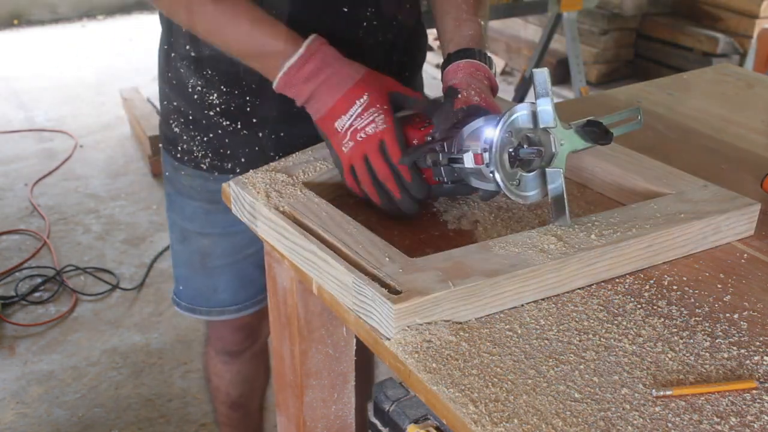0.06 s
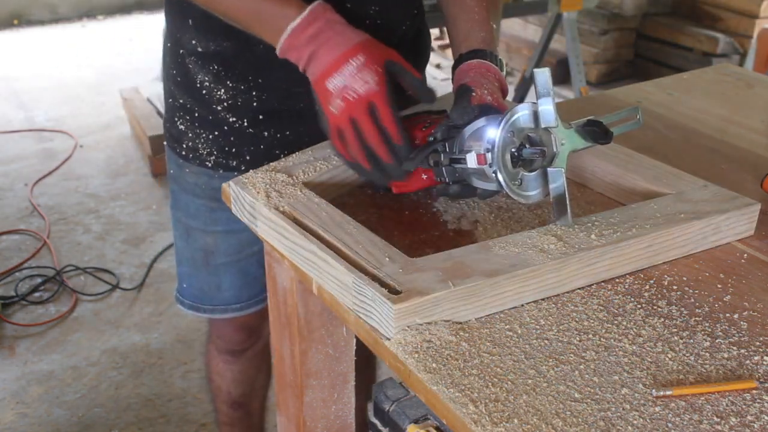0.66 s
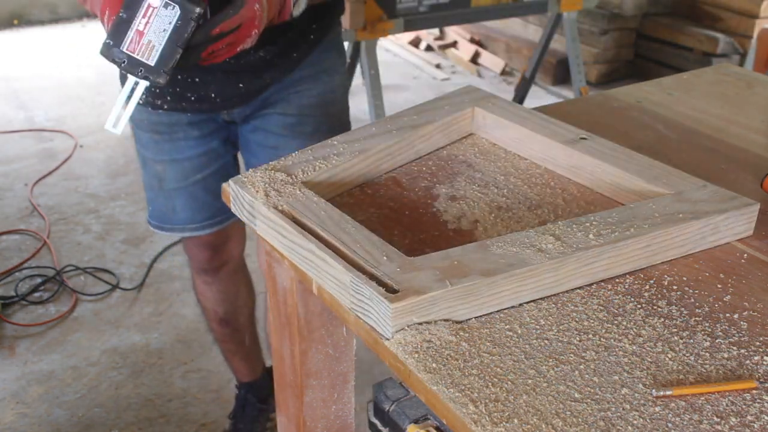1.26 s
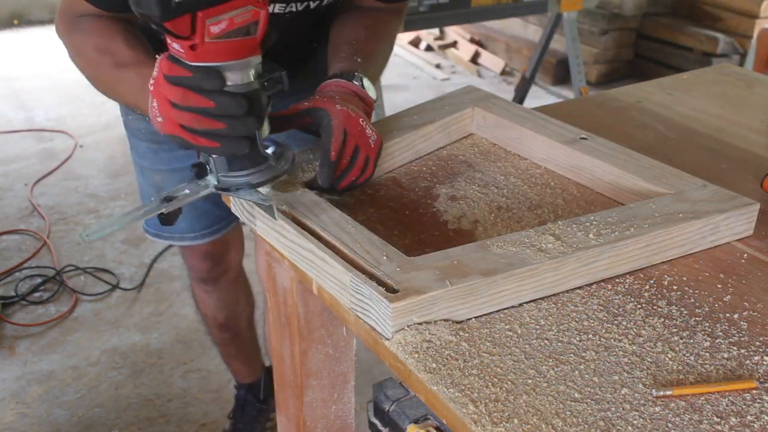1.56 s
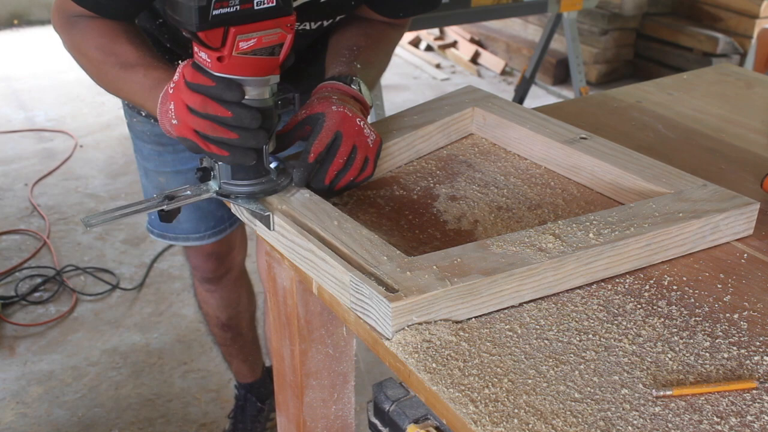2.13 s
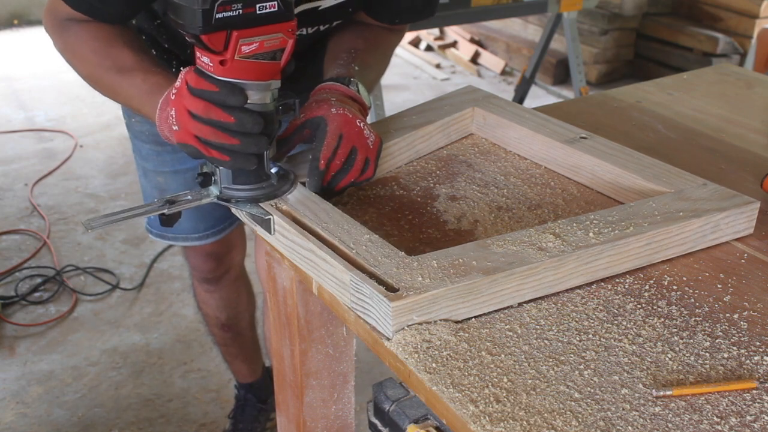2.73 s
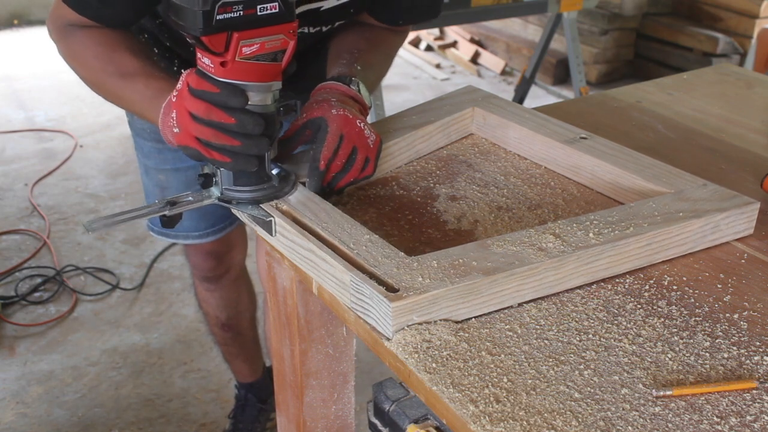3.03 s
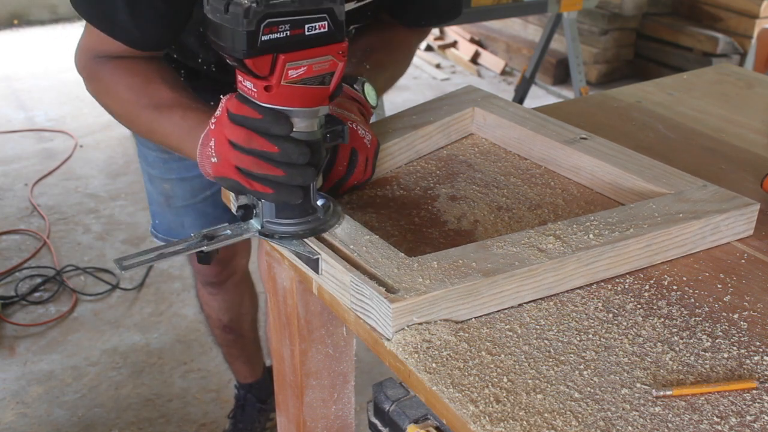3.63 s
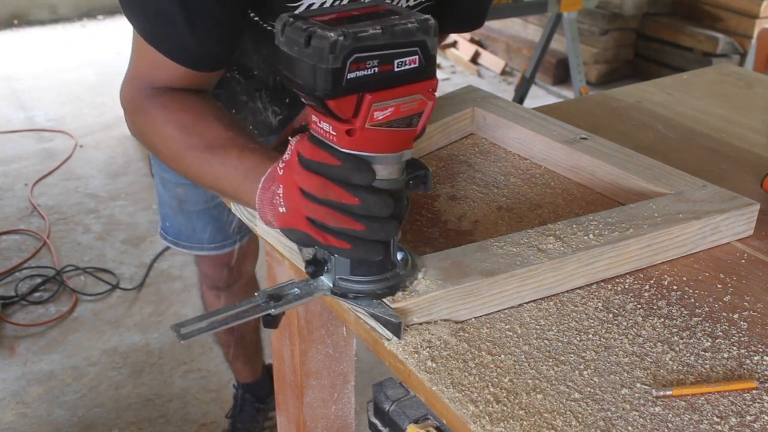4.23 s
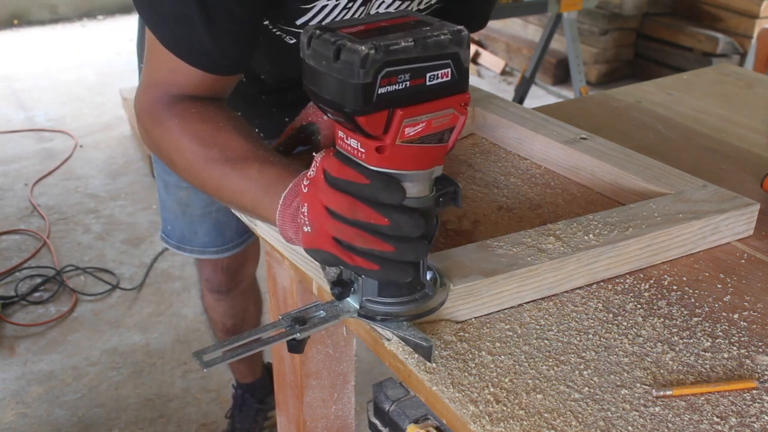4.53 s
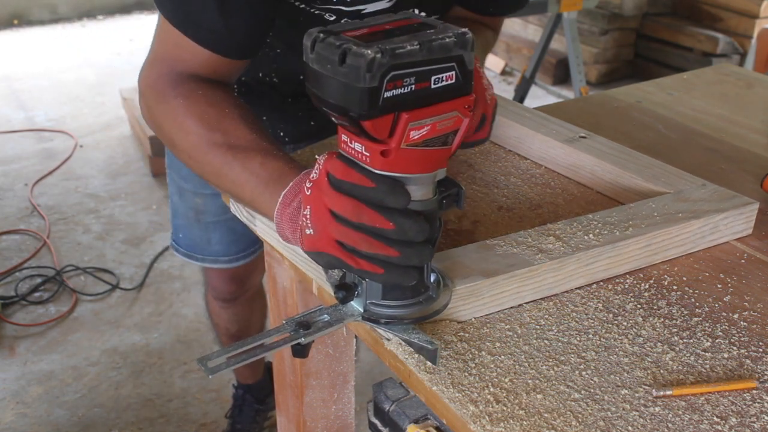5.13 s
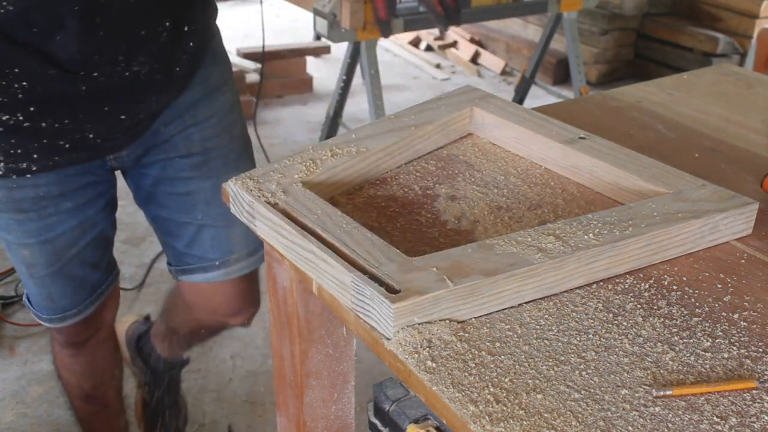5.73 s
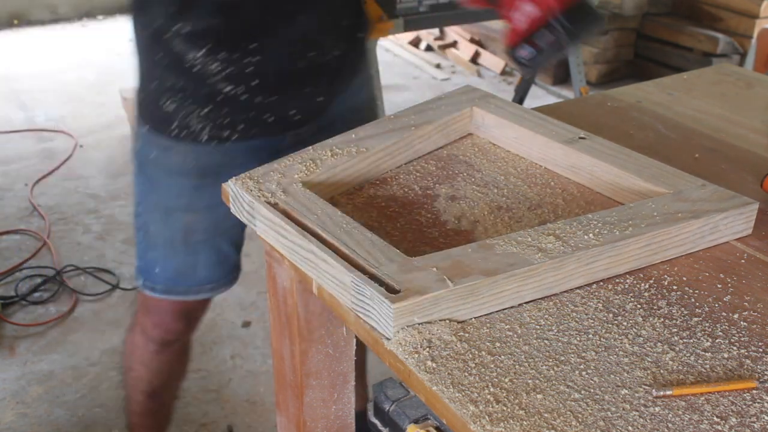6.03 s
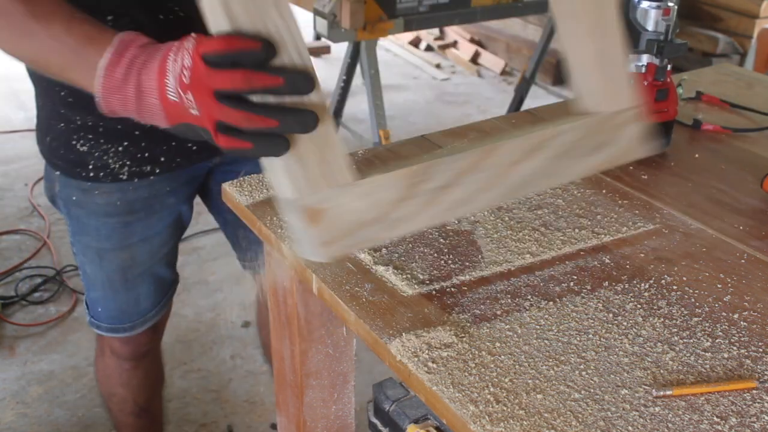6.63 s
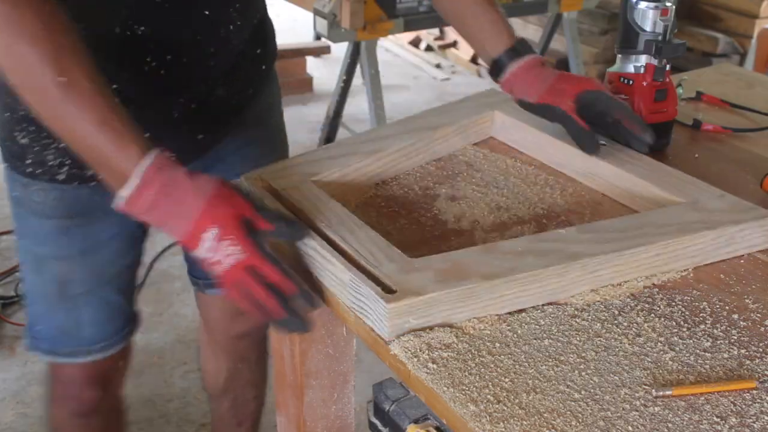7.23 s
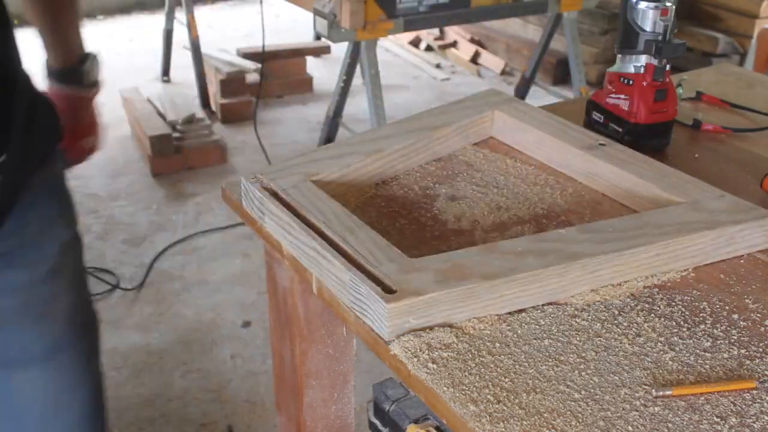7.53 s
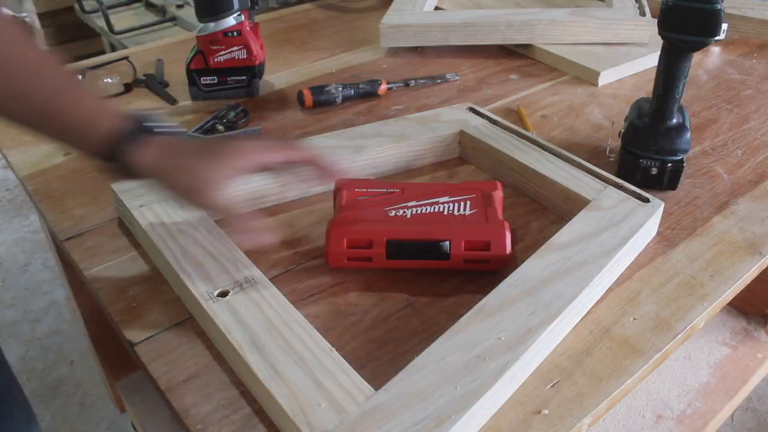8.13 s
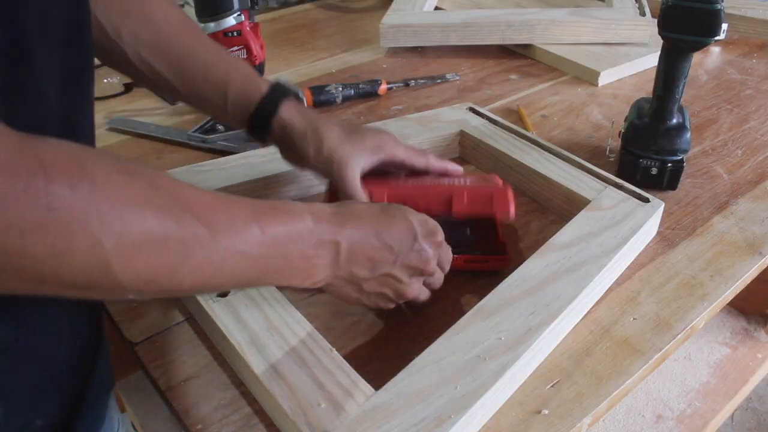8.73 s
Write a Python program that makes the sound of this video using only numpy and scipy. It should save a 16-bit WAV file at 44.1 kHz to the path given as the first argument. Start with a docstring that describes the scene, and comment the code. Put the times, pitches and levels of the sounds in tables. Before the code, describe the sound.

After a faint glove rustle and a few clicks, a small cordless router spins up and runs briefly with a high whine. It bites into a wooden frame, its pitch sagging and wavering amid rasping chips, then quickly winds down. The frame is knocked on the bench several times, and a plastic case is put down and unlatched. Everything is close, over quiet workshop air and a thin hiss.

```python
"""A cordless trim router spins up, idles, grooves a wooden frame and brakes. Its two-flute bit slows and
sings under load: harmonics of the spindle speed in fan air and chip noise. Before and after, gloves rub
the wood, the tool is set down, the frame is knocked on the bench to shed chips, and a plastic bit case
is put down and unlatched; each blow is ringing modes over a noise burst. Behind it: dull workshop air,
a thin high hiss and a few faint, distant whistles."""
import sys
import numpy as np
from scipy import signal
from scipy.fft import rfft, irfft, next_fast_len
from scipy.io import wavfile
from scipy.ndimage import uniform_filter1d

SR = 44100
rng = np.random.default_rng(int(sys.argv[2]) if len(sys.argv) > 2 else 0)


def unload_wav(signal):
    """Save mono or channel-first audio to the path in sys.argv[1] as 16-bit WAV at rate SR, clipped to [-1, 1]."""
    wavfile.write(
        sys.argv[1],
        SR,
        np.round(np.clip(np.atleast_2d(signal).T, -1, 1) * 32767).astype(np.int16),
    )


N = 395577
TIME = np.arange(N) / SR

# spindle speed, sagging under feed: t/s, f/Hz
CUT_SPEED = [(2.22, 495.2), (2.27, 489.7), (2.46, 446.0), (2.5, 460.3), (2.77, 442.6), (3.01, 455.0),
             (3.05, 479.2), (3.14, 472.5), (3.25, 442.7), (3.35, 451.2), (3.47, 417.6), (3.55, 421.4),
             (3.79, 405.3), (3.86, 381.4), (3.95, 411.3), (4.09, 403.1), (4.15, 422.7), (4.23, 410.4),
             (4.36, 418.6), (4.44, 450.2), (4.55, 440.9), (4.76, 468.3), (4.81, 461.8), (4.95, 473.0),
             (5.17, 466.7)]
# treble passing hands and workpiece: t/s, gain/dB
OPENNESS = [(1.4, -8), (2.1, -8), (2.6, 1), (3.3, 6), (3.8, 8), (4.25, 10.5), (4.7, -4), (5.2, -17)]
# idle harmonics: order, level at contact/dB, growth/(dB/s)
IDLE_LINES = [(1, -46, 6), (2, -41, 23), (4, -50.5, 11), (6, -55, -5), (8, -49.5, -13.5), (10, -57, 0),
              (12, -48, 3), (16, -57, -8.5)]
# housing resonances blown by the fan: f/Hz, level/dB
HOUSING_MODES = [(1265, -51.5), (1782, -48), (2062, -50.5), (2300, -51), (4172, -56.5)]
# cut envelopes (order 1, order 2, middle orders, high orders): t/s, level/dB
HUM_LEVEL = [(2.24, -83), (2.28, -40), (2.44, -48), (2.55, -38.5), (2.7, -35.5), (2.98, -38.5),
             (3.1, -48.5), (3.33, -43), (3.5, -61), (3.68, -70), (3.76, -48), (3.83, -65), (3.98, -53.5),
             (4.29, -62.5), (4.33, -43.5), (4.52, -47), (4.74, -40), (4.82, -55), (4.92, -34.5),
             (5.02, -37), (5.17, -43.5)]
FLUTE_LEVEL = [(2.24, -69), (2.27, -33), (2.58, -47), (2.91, -38), (2.95, -46.5), (3.07, -33.5),
               (3.22, -49), (3.44, -41), (3.72, -60.5), (3.802, -32), (3.86, -38.5), (3.95, -40.5),
               (4.08, -28.5), (4.12, -41.5), (4.23, -35.5), (4.39, -41.5), (4.44, -30.5), (4.85, -34),
               (5.04, -32), (5.17, -38)]
BITE_LEVEL = [(2.24, -77), (2.31, -44), (2.48, -48), (2.78, -51), (3.04, -45.5), (3.09, -47), (3.2, -49.5),
              (3.29, -48.5), (3.38, -51), (3.78, -52), (3.88, -55), (4.02, -47), (4.11, -49), (4.26, -44.5),
              (4.29, -48.5), (4.36, -46), (4.45, -51.5), (4.8, -50), (5.17, -48)]
EDGE_LEVEL = [(2.24, -80), (2.29, -56), (2.4, -43.5), (2.67, -50), (2.73, -53), (3.1, -46.5), (3.48, -40),
              (3.76, -45), (3.9, -51), (3.96, -40), (4.45, -48.5), (4.53, -36), (4.72, -59.5),
              (4.78, -39.5), (4.86, -44.5), (5.17, -37.5)]
# middle (bite) and high (edge) harmonics: order, relative level/dB
BITE_ORDERS = [(3, 1), (4, 4.5), (5, 1), (6, 5.5), (7, 0.5), (8, 6.5), (9, 2), (10, 3.5), (11, -1.5),
               (12, 4.5)]
EDGE_ORDERS = [(13, -4.5), (14, -2.5), (15, -10.5), (16, -6), (17, -12), (18, -9), (19, -16), (20, -14.5),
               (21, -17.5), (22, -18.5), (23, -25), (24, -22.5), (26, -26), (28, -35)]
# bite slope along the frame: t/s, tilt/(dB/octave)
BITE_TILT = [(2.24, -0.5), (2.9, -2.2), (3.3, 3.5), (3.7, 4), (4.2, 0.5), (4.5, -1), (5.17, -1.5)]
# nulls of a low tone: t/s, order
DROPOUTS = [(2.34, 1), (2.44, 1), (2.485, 1), (3.06, 1), (3.47, 1), (4.5, 1), (4.55, 1), (2.302, 2),
            (2.465, 2), (2.71, 2), (3.29, 2), (3.54, 2), (3.859, 2), (4.172, 2), (4.39, 2), (4.893, 2),
            (5.106, 2)]
# feed eases, tones dip: t/s, depth/dB, half length/s
LET_UPS = [(2.425, 12.5, 0.0056), (3.02, 9.5, 0.015), (3.245, 7, 0.012), (3.385, 4.5, 0.012),
           (4.29, 11.5, 0.014)]
# chip spray: t/s, level/dB, low shelf/dB, high shelf/dB
SPRAY = [(2.24, -43.5, 1.5, -4.5), (2.4, -48.5, 0.5, 7.5), (2.58, -46, 6, -5), (2.68, -48.5, 8, 2),
         (2.96, -41.5, 2, -4.5), (3.2, -47, 0, -2), (3.42, -50.5, -1, 8), (3.58, -53.5, 0, -5),
         (3.81, -46.5, 0, 0), (3.85, -38.5, -7, -4.5), (3.9, -41.5, 4, -4), (3.94, -50.5, -1, 1),
         (4.2, -49, 2, 1), (4.33, -44, -2, 2), (4.43, -48, 3, -4), (4.6, -56, 3, 0), (4.75, -46, 3.5, 3),
         (4.92, -43.5, 3.5, -2), (5.17, -44.5, 1, 3)]
# splinters tear out: t/s, level/dB, half length/s
SNAGS = [(2.286, -39, 0.037), (2.445, -41, 0.009), (3.12, -38.5, 0.022), (3.2, -50, 0.016),
         (3.85, -44, .02), (4.252, -47, 0.0064), (4.374, -45, 0.013)]
# a harmonic meets a bit or housing resonance: t/s, order, level/dB, half length/s
SQUEALS = [(1.454, 8, -33.5, .025), (1.481, 2, -43, 0.0088), (1.52, 8, -39.5, 0.038),
           (1.553, 2, -43.5, 0.04), (1.56, 12, -42, 0.04), (1.71, 12, -43, 0.053),
           (1.983, 12, -36.5, 0.038), (2.208, 9, -37.5, 0.012), (2.271, 3, -43.5, 0.037),
           (2.302, 5, -34.5, 0.018), (2.363, 2, -30.5, 0.032), (2.382, 5, -31.5, 0.013),
           (2.55, 6, -36.5, 0.012), (2.605, 6, -33, 0.021), (2.64, 8, -30, 0.04), (2.68, 4, -39.5, 0.033),
           (2.744, 5, -38.5, 0.078), (2.746, 10, -40.5, 0.074), (2.76, 6, -30, 0.04),
           (2.811, 4, -35, 0.029), (2.838, 6, -36, 0.037), (2.865, 8, -32.5, .045), (2.956, 10, -37, 0.034),
           (2.981, 3, -38, 0.013), (3.156, 8, -35, 0.064), (3.29, 12, -36.5, 0.072),
           (3.321, 8, -30.5, 0.016), (3.409, 4, -39.5, 0.019), (3.534, 8, -31.5, 0.052),
           (3.638, 8, -25.5, 0.037), (3.678, 5, -40.5, 0.081), (3.725, 6, -35, 0.091),
           (3.725, 8, -33.5, 0.035), (3.978, 4, -35, 0.053), (3.993, 8, -35, 0.037),
           (4.037, 12, -35.5, 0.024), (4.147, 4, -37, 0.021), (4.21, 3, -43.5, .06), (4.25, 10, -39, 0.077),
           (4.38, 4, -56, 0.048), (4.98, 6, -36.5, 0.061), (5.02, 4, -41, 0.032), (5.156, 5, -39, 0.03),
           (5.197, 8, -35, 0.023), (5.216, 2, -36.5, 0.026)]
# brake shakes the tool: t/s, level/dB, half length/s
BRAKE_RATTLE = [(5.242, -46.5, 0.027)]

# frame knocked on the bench: t/s, peak/dB, treble/dB
KNOCKS = [(5.325, -40, -26), (6.594, -21, -9), (6.606, -25, -12), (6.764, -13.5, 5.5), (6.837, -18.5, -5),
          (6.848, -22.5, 9), (7.162, -16.5, 13.5)]
# soft bumps of hands, tool and frame: t/s, peak/dB, bass/dB, treble/dB
BUMPS = [(0.004, -36, 18, 5), (0.092, -43.5, 19.5, 30), (0.277, -51.5, 24, -10), (0.814, -28.5, -9, 18.5),
         (6.176, -30, 2.5, 0), (6.757, -32, -1, -5), (6.829, -27.5, -6, -5), (7.14, -38.5, 15, 17),
         (7.167, -29.5, 16, -11), (8.059, -40, 16, -10)]
# router and fence click: t/s, peak/dB, treble/dB, T60/s
TOOL_CLICKS = [(0.265, -40, -6, 0.018), (0.87, -24.5, 22, 0.072), (0.8883, -29, 25, 0.031),
               (1.227, -37, -24, 0.19), (2.217, -23, -12, 0.055), (6.216, -27.5, -36, 0.13),
               (6.263, -26.5, -25, 0.068), (7.092, -43, 15, 0.023), (7.67, -38.5, 3.5, 0.11)]
# case lands corner by corner, then unlatches: t/s, peak/dB, bass/dB
CASE_HITS = [(8.051, -30, 5), (8.058, -30, -5), (8.0607, -14.5, -6), (8.0664, -20, -1), (8.701, -25, 8),
             (8.709, -29.5, -1), (8.7199, -24, -2)]
# body modes: f/Hz, relative level/dB, T60/s
FRAME_MODES = [(153.7, -18.5, 0.3), (266, -14, 0.3), (322.6, 5, 0.084), (352, 2, 0.19), (390, 4, 0.078),
               (523, -1, 0.058), (613, 11.5, 0.047), (776, 3, 0.071), (865, 3.5, 0.049), (962, 3.5, 0.044),
               (1161, -3.5, 0.043), (1410, -5.5, 0.019), (1510, -12, 0.017), (1743, 3.5, 0.018),
               (2460, -17.5, 0.05)]
PLASTIC_MODES = [(312, -28, 0.016), (434, 7, 0.06), (583, 8.5, 0.047), (805, 12.5, 0.048),
                 (1170, 16.5, 0.013), (1185, 9.5, 0.029), (1446, 6.5, 0.024), (2030, 7, 0.043),
                 (3470, 7, 0.018)]
# loose metal shaken by knocks: t/s, level/dB
JINGLES = [(6.768, -44.5), (6.844, -44), (7.168, -48.5)]
# its modes: f/Hz, relative level/dB
METAL_MODES = [(6500, 1.5), (8220, -3.5), (10750, -11), (14200, -29)]
# gloves and clothes, one curve per passage: t/s, level/dB
RUSTLES = [
    [(0.0, -58.5), (0.2, -63.5), (0.47, -62.5), (0.79, -70.5), (0.9, -78), (0.99, -74), (1.05, -62),
     (1.17, -63.5), (1.35, -63.5)],
    [(5.42, -69), (6.52, -70.5), (6.69, -50), (6.85, -87), (7.06, -61.5), (7.26, -61.5), (8.12, -70.5),
     (8.62, -68.5), (8.96, -61)],
]
# glove or tool slides on wood: t/s, level/dB, rise/s, fall/s
SCUFFS = [(0.5, -56.5, 0.039, 0.07), (0.82, -40, 0.011, 0.021), (1.254, -41, 0.019, 0.016),
          (5.239, -42, 0.032, 0.016), (5.631, -50.5, 0.063, .012), (5.855, -58.5, 0.059, 0.02),
          (6.09, -60, 0.033, 0.063), (6.55, -53.5, 0.065, 0.065), (6.668, -47.5, 0.022, 0.02),
          (7.04, -53, .01, 0.0085), (7.089, -37, 0.0034, 0.015), (7.357, -53.5, 0.0062, 0.0085),
          (7.466, -48.5, 0.031, 0.033), (8.605, -59.5, 0.021, 0.059), (8.695, -54.5, 0.017, 0.0066)]
# distant whistles: t/s, f/Hz, level/dB, half length/s
WHISTLES = [(5.97, 1890, -68.5, 0.048), (8.017, 3800, -70, .025), (8.814, 2020, -60, 0.032),
            (8.936, 2030, -77, 0.022)]

# noise spectra: f/Hz, relative density/dB
FAN_SPECTRUM = [(88, -45), (150, -32.5), (300, -26), (453, -19), (490, -27), (561, -14.5), (912, -5.5),
                (966, -9), (1110, -6.5), (1760, -1.5), (3760, -3.5), (4060, -6.5), (5230, -7), (6110, -3),
                (9180, -10.5), (15500, -42)]
CHIP_SPECTRUM = [(120, -44.5), (250, -30), (450, -12), (680, 3), (1150, 2), (1450, 1.5), (1900, 8.5),
                 (3400, 6), (5000, 1), (7500, 4), (9000, -4.5), (10500, -16), (13000, -21.5), (15500, -44)]
THUD_SPECTRUM = [(40, -28), (120, 0.5), (160, 5), (220, -6), (340, 9), (550, 1.5), (1000, -3), (1600, -8.5),
                 (2600, -15), (5000, -28), (8000, -36), (15500, -55)]
CRACK_SPECTRUM = [(40, -5), (150, -29), (400, 1.5), (1200, 3), (2200, 2.5), (4000, 0), (7500, -1.5),
                  (11000, -14), (15500, -23)]
RUB_SPECTRUM = [(60, -21.5), (200, -14), (600, 2.5), (1500, 2), (3000, 2.5), (5500, -2), (8500, -6.5),
                (11000, -27.5), (15500, -41)]
WORKSHOP_SPECTRUM = [(18, -45), (30, -9.5), (283, 9.5), (360, 11), (533, 8.5), (825, 8), (1100, 4),
                     (1850, 10.5), (5500, -30), (7150, -40.5), (12100, -120)]
HISS_SPECTRUM = [(5000, -18.5), (5900, -8), (6500, 2.5), (7100, -3), (7600, -6.5), (8300, 0.5),
                 (9200, -7.5), (10000, -24), (11000, -27.5), (15500, -52.5)]
RATTLE_SPECTRUM = [(100, -36), (350, -1.5), (750, -3), (2000, -28), (8000, -50)]

ON_S, CONTACT_S, OFF_S = 1.335, 2.215, 5.177
IDLE_HZ = 495.2


def router(bite_in_s=.0084, lift_out_s=.012):
    """The router runs free, sinks into the wood, lifts out and brakes."""
    speed_hz = spindle_hz()
    braking = TIME > OFF_S
    running = np.minimum(ramp(1.372, .0092), 1 - ramp(5.19, .078))
    cutting = ramp(CONTACT_S, bite_in_s) * (1 - ramp(OFF_S, lift_out_s))
    # the drive judders in spin-up and braking; grain tugs at the spindle
    judder = np.maximum(np.interp(speed_hz, [350, 450], [1, 0]), braking) * (1 - cutting)
    wobble = (.0002 + .0014 * cutting) * drift(30) + (.035 + .03 * braking) * judder * drift(300)
    angle = 2 * np.pi * np.cumsum(speed_hz * (1 + wobble)) / SR
    pace = speed_hz / IDLE_HZ
    free = motor(angle, pace, judder) + fan(pace) + chirp(angle, judder)
    sound = np.sqrt(1 - cutting) * free + np.sqrt(cutting) * cut(angle) + squeals(angle, judder)
    openness_db, = curves(OPENNESS)
    return shelf(running * sound, 9500, "high", openness_db) + brake_rattle()


def spindle_hz(aim_hz=503, spin_up_s=.082, brake_s=.1):
    """Exponential spin-up, governed idle, sag under load, exponential braking."""
    climb_hz = aim_hz * (1 - np.exp(-np.maximum(TIME - ON_S, 0) / spin_up_s))
    held_hz = np.minimum(curves(CUT_SPEED)[0], IDLE_HZ)
    return np.minimum(climb_hz, held_hz) * np.exp(-np.maximum(TIME - OFF_S, 0) / brake_s)


def motor(angle, pace, judder, waver_db=3):
    """Idle harmonics grow with speed; the small housing radiates little bass."""
    to_contact_s = np.maximum(CONTACT_S - TIME, 0)
    lines = sum(from_db(db - growth * to_contact_s + waver_db * drift(10))
                * partial(order * angle, rough=.0091 * order + .5 * judder, flutter_hz=40)
                for order, db, growth in IDLE_LINES)
    return pace ** 3.9 * filtered_twice(lines, 380, "high")


def fan(pace, idle_db=-35.5, db_per_octave=6.5):
    """Fan air rings the housing and grows with speed."""
    housing = sum(from_db(db) * partial(2 * np.pi * hz * TIME, rough=1, flutter_hz=35.3)
                  for hz, db in HOUSING_MODES)
    air = from_db(idle_db) * noise(FAN_SPECTRUM) + housing
    return air * from_db(db_per_octave * np.log2(pace + 1e-6) + drift(31))


def chirp(angle, judder, resonance_hz=(2750, 4200)):
    """At low speed, high motor orders sweep raspily through a housing resonance."""
    driven = from_db(-34.5) * (TIME < OFF_S) * (.7 * np.sin(11 * angle) + np.sin(13 * angle))
    whine = from_db(-39) * partial(8 * angle, rough=.7, flutter_hz=120)
    rasp = 1 + .65 * drift(270)
    return judder * filtered_twice((driven + whine) * rasp, resonance_hz, "band")


def cut(angle, jitter_rad=.014, tear_db=1.65):
    """Each flute strikes once a turn and throws chips; tearing fibres trade overtones for rasp."""
    tones = sum(from_db(curves(level)[0]) * dropouts(order)
                * partial(order * angle, rough=.059 * order, flutter_hz=15.7)
                for order, level in ((1, HUM_LEVEL), (2, FLUTE_LEVEL)))
    strike_angle = angle + jitter_rad * drift(110)
    overtones = cut_overtones(strike_angle)
    spray_db, lows_db, treble_db = curves(SPRAY)
    spray = chips(strike_angle, lows_db, treble_db)
    tear = from_db(tear_db * drift(37))
    snags = swells((s, from_db(db), half_s) for s, db, half_s in SNAGS)
    spray_gain = np.hypot(from_db(spray_db) * tear, snags)
    return from_db(-swells(LET_UPS)) * (tones + overtones / tear) + spray_gain * spray


def dropouts(order, width_s=.013):
    """Gain of a low tone, swinging through zero at each dropout."""
    return np.prod([np.tanh((s - TIME) / width_s) for s, k in DROPOUTS if k == order], axis=0)


def cut_overtones(angle, grain_db=2, grain_hz=14):
    """Uneven grain swells and fades each overtone on its own."""
    tilt_db, = curves(BITE_TILT)
    bite = sum(from_db(db - 1.5 + tilt_db * np.log2(order / 6) + grain_db * drift(grain_hz))
               * partial(order * angle, rough=.56, flutter_hz=3.27 * order)
               for order, db in BITE_ORDERS)
    edge = sum(from_db(db - 3 + grain_db * drift(grain_hz))
               * partial(order * angle, rough=1, flutter_hz=.092 * order ** 2)
               for order, db in EDGE_ORDERS)
    return from_db(curves(BITE_LEVEL)[0]) * bite + from_db(curves(EDGE_LEVEL)[0]) * edge


def chips(angle, lows_db, treble_db):
    """Chips leave in uneven puffs, two a turn."""
    puffs = unit_rms(1 + .6 * np.cos(2 * angle)) * from_db(1.2 * drift(35) + 2.2 * drift(400) - .7)
    spray = filtered_twice(noise(CHIP_SPECTRUM) * puffs, 330, "high")
    return shelf(shelf(spray, 1500, "low", lows_db), 4600, "high", treble_db)


def squeals(angle, judder):
    """Single harmonics catch a resonance, hold and let go; judder makes them rasp."""
    rasp = 1 + .5 * judder * drift(200)
    notes = 0
    for order in sorted({row[1] for row in SQUEALS}):
        catches = [(s, from_db(db), half_s) for s, k, db, half_s in SQUEALS if k == order]
        notes += swells(catches, power=4) * partial(order * angle, rough=.059, flutter_hz=30)
    return filtered_twice(rasp * notes, 400, "high")


def brake_rattle():
    """The brake shakes the tool: a short swell of low noise."""
    return swells((s, from_db(db), half_s) for s, db, half_s in BRAKE_RATTLE) * noise(RATTLE_SPECTRUM)


def wood_blows(rebound_s=.009, rebound_loss_db=11, rock_s=6.319, rock_gap_s=.067, gap_ratio=.88):
    """Rebounding knocks, soft bumps and the rocking router sound through frame and bench."""
    knocks = [(s + k * rebound_s, db - k * rebound_loss_db, -7.5, treble_db, .047)
              for s, db, treble_db in KNOCKS for k in range(2)]
    rocking = [(rock_s + rock_gap_s * sum(gap_ratio ** j for j in range(k)), -48.5, 11, 0)
               for k in range(5)]
    bumps = [(*row, .12) for row in BUMPS + rocking]
    wood = dict(modes=FRAME_MODES, spectrum=THUD_SPECTRUM, bass_hz=258, treble_hz=2000)
    return (blows(knocks, attack_s=.0015, ring_db=-7, **wood)
            + blows(bumps, attack_s=.0025, ring_db=-14, **wood))


def plastic_blows():
    """Thin clicks of the tool, fuller clacks of the hollow case."""
    clicks = [(s, db, -41, treble_db, t60_s) for s, db, treble_db, t60_s in TOOL_CLICKS]
    clacks = [(*row, -3.5, .046) for row in CASE_HITS]
    plastic = dict(modes=PLASTIC_MODES, spectrum=CRACK_SPECTRUM, bass_hz=533, treble_hz=2950)
    return (blows(clicks, attack_s=.00087, ring_db=-18.5, **plastic)
            + blows(clacks, attack_s=.00015, ring_db=-10, **plastic))


def blows(events, attack_s, ring_db, modes, spectrum, bass_hz, treble_hz):
    """Modes ring over a dense thud. Events: t/s, peak/dB, bass/dB, treble/dB, thud T60/s."""
    out, t = np.zeros(N + SR), TIME[:SR // 3]
    for s, peak_db, bass_db, treble_db, thud_t60_s in events:
        ring = 0
        for hz, db, t60_s in modes:
            force, phase = rng.random(2)
            envelope = from_db(db + 1.23 * (force - 2.5) - 60 * t / t60_s)
            ring += envelope * np.sin(2 * np.pi * (hz * t + phase))
        thud = noise(spectrum, size=len(t)) * from_db(-60 * t / thud_t60_s)
        hit = (from_db(ring_db) * ring + thud) * (1 - np.exp(-t / attack_s))
        bass, treble = filtered(hit, bass_hz, "low"), filtered(hit, treble_hz, "high")
        middle = filtered(filtered(hit, bass_hz, "high"), treble_hz, "low")
        hit = from_db(bass_db) * bass - middle + from_db(treble_db) * treble
        start = round(s * SR)
        out[start:start + len(t)] += from_db(peak_db) * hit / np.abs(hit).max()
    return out[:N]


def lifted_frame(lifted_s=6.845, damped_s=6.96, hz=265, level_db=-44, t60_s=.4):
    """Clear of the bench, the frame rings until the grip damps it."""
    envelope = from_db(level_db - 60 * np.abs(TIME - lifted_s) / t60_s) * gate(lifted_s, damped_s)
    return envelope * np.sin(2 * np.pi * hz * TIME)


def jingles(rise_s=.0098, t60_s=.12):
    """Loose metal rings after the hard knocks."""
    envelope = sum(ramp(s, rise_s) * from_db(db - 60 * np.abs(TIME - s) / t60_s) for s, db in JINGLES)
    return envelope * sum(from_db(db) * partial(2 * np.pi * hz * TIME, rough=.59, flutter_hz=70)
                          for hz, db in METAL_MODES)


def gloves(grain_db=2.3):
    """Grainy friction on dusty wood: a faint rustle with swelling scuffs."""
    power = sum((from_db(curves(rows)[0]) * gate(rows[0][0] - .01, rows[-1][0] + .084)) ** 2
                for rows in RUSTLES)
    for s, db, rise_s, fall_s in SCUFFS:
        scuff = from_db(db) * np.exp(-np.maximum((s - TIME) / rise_s, (TIME - s) / fall_s))
        power += scuff ** 2
    return np.sqrt(power) * noise(RUB_SPECTRUM) * unit_rms(from_db(grain_db * drift(150)))


def near_echoes(x, first_db=-26.5, delays_s=(.0047, .0083, .0131, .0197)):
    """Weak reflections off bench, floor and walls blur the glides."""
    return sum(from_db(first_db - 2 * k) * np.interp(TIME - delay_s, TIME, x, left=0)
               for k, delay_s in enumerate(delays_s))


def room_tail(x, level_db=-27, t60_s=.25):
    """Faint, dull reverberation of the workshop."""
    t = TIME[:SR // 2]
    tail = filtered(rng.standard_normal(len(t)), 3000, "low") * from_db(-60 * t / t60_s) * (t > .006)
    return from_db(level_db) * signal.fftconvolve(x, tail / np.sqrt(np.sum(tail ** 2)))[:N]


def workshop_air():
    """Dull air and high hiss, joined near the end by a narrow sizzle."""
    sizzle = filtered(filtered(rng.standard_normal(N), 6300, "high"), 6100, "low")
    sizzle = unit_rms(filtered(sizzle, [6280, 6580], "band")) * ramp(7.74, .06)
    steady = from_db(-71.5) * noise(WORKSHOP_SPECTRUM) + from_db(-63) * noise(HISS_SPECTRUM)
    return steady + from_db(-60.5) * sizzle


def far_whistles():
    """Short wavering notes from outside, blurred by distance."""
    return sum(from_db(db) * np.exp(-((TIME - s) / half_s) ** 2)
               * partial(2 * np.pi * hz * TIME, rough=.52, flutter_hz=70)
               for s, hz, db, half_s in WHISTLES)


def ducking(loud, threshold_db=-39, recovery_db_per_s=37, depth_db=8.5):
    """Background gain: sinks under loud sounds, then creeps back."""
    level_db = 10 * np.log10(np.maximum(uniform_filter1d(loud ** 2, size=220), 1e-12))
    over_db = np.clip(level_db - threshold_db, 0, depth_db)
    held_db = np.maximum.accumulate(over_db + recovery_db_per_s * TIME) - recovery_db_per_s * TIME
    return from_db(-uniform_filter1d(held_db, size=200))


def partial(angle, rough, flutter_hz):
    """Unit-rms tone; the power share `rough` flutters in amplitude and phase."""
    rough = np.clip(rough, 0, 1)
    flutter = drift(flutter_hz) * np.sin(angle) + drift(flutter_hz) * np.cos(angle)
    steady = np.sin(angle + rng.uniform(0, 2 * np.pi))
    return np.sqrt(2 * (1 - rough)) * steady + np.sqrt(rough) * flutter


def drift(rate_hz):
    """Smooth random wander, unit rms."""
    hop, settle = 40, 2000
    pole = np.exp(-2 * np.pi * rate_hz * hop / SR)
    white = rng.standard_normal(N // hop + settle + 2)
    slow = signal.lfilter([1], [1, -2 * pole, pole * pole], white)[settle:]
    return np.interp(np.arange(N) / hop, np.arange(len(slow)), unit_rms(slow))


def noise(spectrum, size=N):
    """Coloured noise, unit rms."""
    length = next_fast_len(size)
    hz = np.maximum(np.fft.rfftfreq(length, 1 / SR), 1)
    points_hz, points_db = np.transpose(spectrum)
    gain = from_db(np.interp(np.log(hz), np.log(points_hz), points_db))
    return unit_rms(irfft(rfft(rng.standard_normal(length)) * gain, length)[:size])


def swells(rows, power=2):
    """Bell curves, flatter on top at higher power. Rows: t/s, height, half length/s."""
    out = np.zeros(N)
    for s, height, half_s in rows:
        near = np.abs(TIME - s) < 4 * half_s
        out[near] += height * np.exp(-((TIME[near] - s) / half_s) ** power)
    return out


def curves(rows):
    """Each column after t/s, interpolated per sample."""
    s, *columns = np.transpose(rows)
    return [np.interp(TIME, s, column) for column in columns]


def ramp(start_s, rise_s):
    return np.clip((TIME - start_s) / rise_s, 0, 1)


def gate(start_s, end_s, edge_s=.01):
    return np.clip(np.minimum(TIME - start_s, end_s - TIME) / edge_s, 0, 1)


def filtered(x, hz, kind):
    return signal.sosfilt(signal.butter(2, hz, kind, fs=SR, output="sos"), x)


def filtered_twice(x, hz, kind):
    return filtered(filtered(x, hz, kind), hz, kind)


def shelf(x, hz, kind, db):
    band = signal.sosfiltfilt(signal.butter(2, hz, kind, fs=SR, output="sos"), x)
    return x + (from_db(db) - 1) * band


def from_db(db):
    return 10 ** (np.asarray(db) / 20)


def unit_rms(x):
    return x / np.sqrt(np.mean(x ** 2) + 1e-20)


def scene():
    """Router and blows up close, over the ducked workshop background."""
    hits = wood_blows() + plastic_blows() + lifted_frame() + jingles()
    machine = router()
    loud = machine + near_echoes(machine) + hits
    background = (workshop_air() + far_whistles()) * ducking(loud)
    return (loud + room_tail(hits) + gloves() + background)[None, :]


def record(dry):
    """Steep low-pass at 15.9 kHz."""
    return signal.sosfilt(signal.ellip(10, .2, 80, 15900, fs=SR, output="sos"), dry)


dry = scene()
out = record(dry)
unload_wav(out)
```